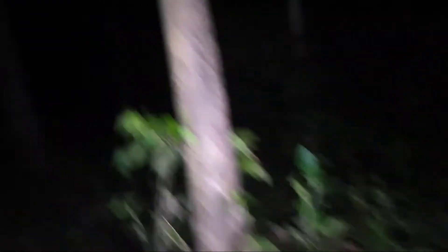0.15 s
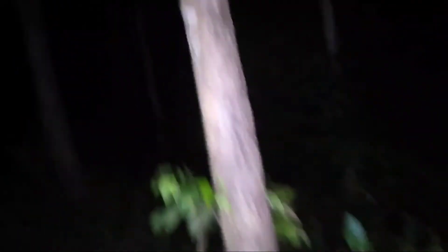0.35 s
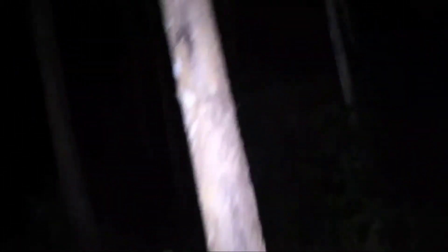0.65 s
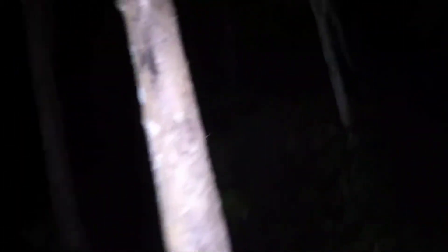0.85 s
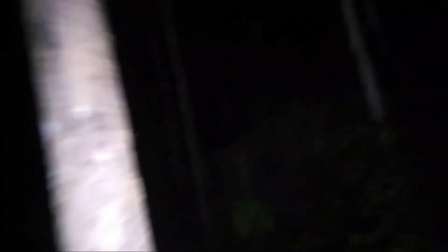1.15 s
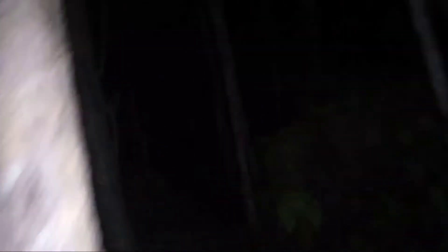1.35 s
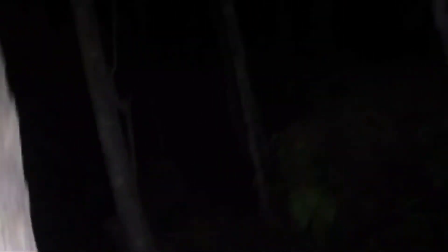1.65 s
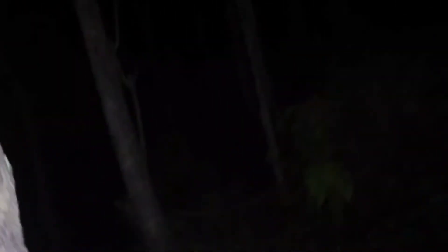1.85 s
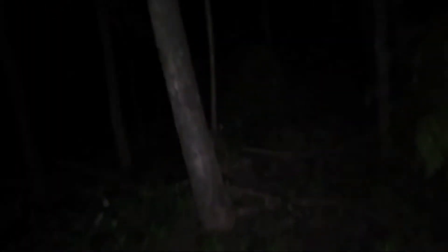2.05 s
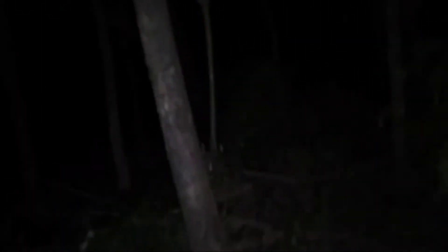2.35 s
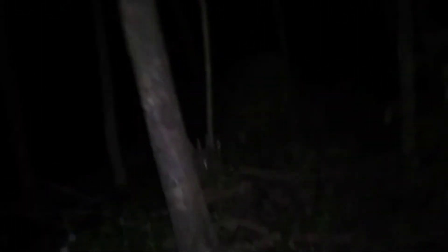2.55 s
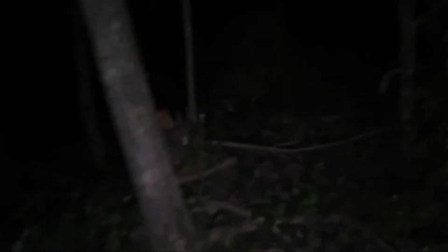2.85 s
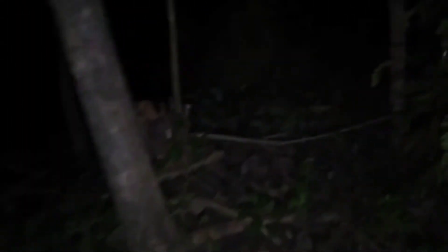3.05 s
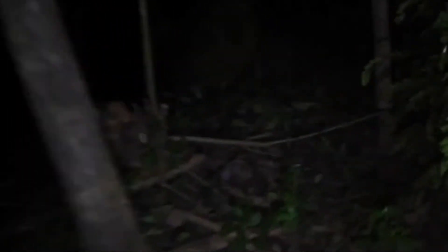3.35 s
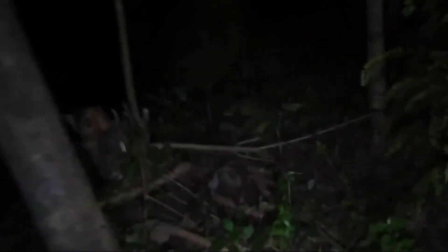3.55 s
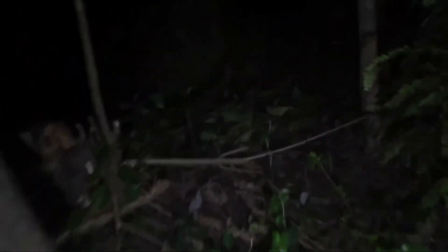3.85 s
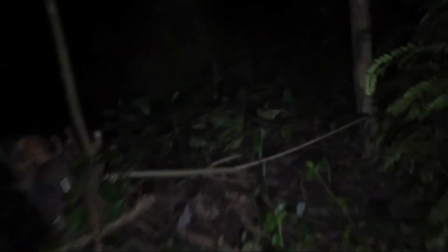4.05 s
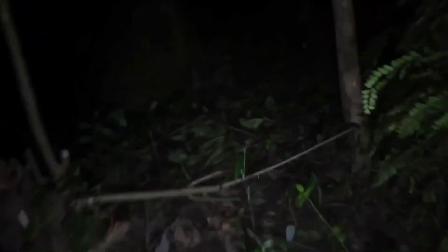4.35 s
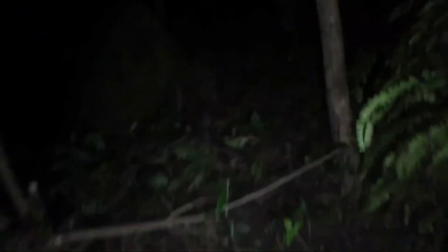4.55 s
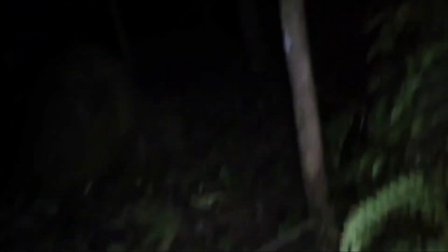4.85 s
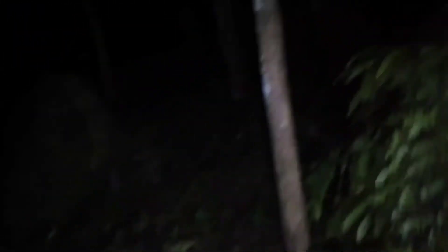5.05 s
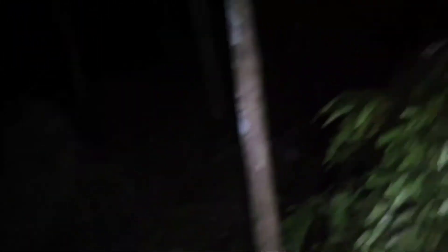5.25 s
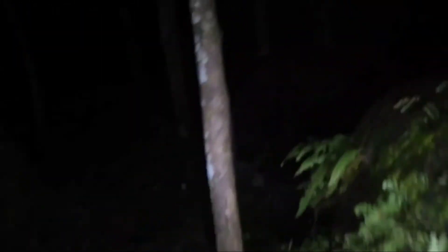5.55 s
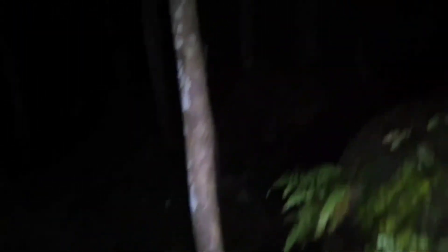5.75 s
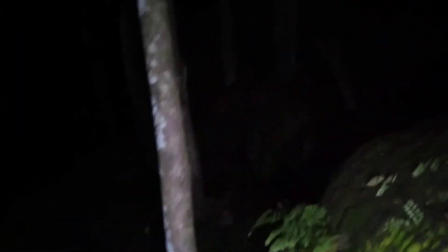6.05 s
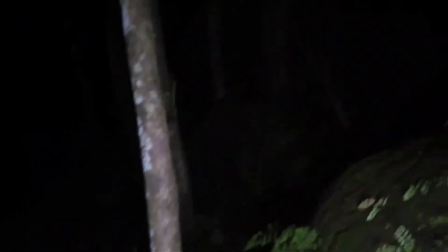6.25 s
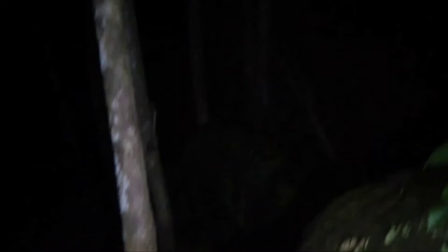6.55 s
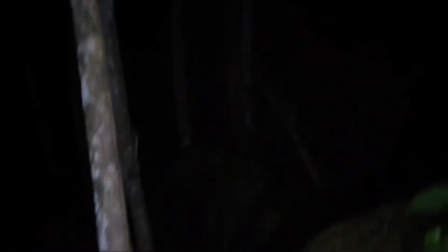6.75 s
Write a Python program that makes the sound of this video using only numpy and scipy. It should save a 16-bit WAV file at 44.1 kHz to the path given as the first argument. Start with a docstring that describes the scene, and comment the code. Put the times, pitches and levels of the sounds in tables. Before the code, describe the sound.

Shrill buzzing insects drone steadily in a dark forest, with crickets chirping below and twigs cracking underfoot as someone moves through undergrowth.

```python
"""A forest at night: a near katydid rasps in threes over a blur of far ones, while crickets trill and chirp lower
down. Wings sound as noisy file teeth and falling notes, shaped stroke by stroke. Someone walking slowly snaps
twigs, each a one-swing crack and a ringing scrunch, and stirs leaf litter made of scattered clicks. Owl-like
hoots, husky sine tones, sound far off in an airy hush with a low drone."""
import sys
import numpy as np
from scipy import signal
from scipy.fft import rfft, irfft
from scipy.io import wavfile
from scipy.ndimage import uniform_filter1d

SR = 44100
rng = np.random.default_rng(int(sys.argv[2]) if len(sys.argv) > 2 else 0)


def generate_wav(sig):
    """Save sig (samples, or channels by samples) to the path in sys.argv[1] as 16-bit PCM at SR."""
    pcm = np.round(np.clip(np.atleast_2d(sig).T, -1, 1) * 32767).astype(np.int16)
    wavfile.write(sys.argv[1], SR, pcm)


N = 305172  # length in samples


def gain_of(db):
    """Decibels to gain."""
    return 10 ** (np.asarray(db) / 20)


def evened(x):
    """Scales to rms 1."""
    return x / np.sqrt(np.mean(x ** 2) + 1e-20)


def add(mix, s, sound):
    """Lays a sound into the mix at s seconds."""
    part = mix[round(s * SR):][:len(sound)]
    part += sound[:len(part)]


def curves(rows, t):
    """Reads every column of a table at the times t, in straight lines between rows."""
    s, *columns = np.transpose(rows)
    return [np.interp(t, s, c) for c in columns]


def coloured(x, points):
    """Weights the spectrum of x by a curve of (Hz, dB), then evens it to rms 1."""
    f, db = np.transpose(points)
    hz = np.fft.rfftfreq(len(x), 1 / SR)
    weight_db = np.interp(np.log(hz + 1), np.log(f), db, -120, -120)
    return evened(irfft(rfft(x) * gain_of(weight_db), len(x)))


def resonate(x, hz, width_hz):
    """Rings x at a pitch that may move: shifts hz down to zero, smooths twice, and shifts back."""
    turn = np.exp(2j * np.pi * np.cumsum(hz * np.ones(len(x))) / SR)
    r = np.exp(-np.pi * width_hz / SR)
    smooth = signal.lfilter([(1 - r) ** 2], [1, -2 * r, r * r], x / turn)
    return 2 * (turn * smooth).real


def wander(per_s):
    """Slow chance of rms 1, heading for a new value per_s times a second."""
    steps = round(N / SR * per_s) + 2
    return evened(np.interp(np.arange(N) / SR * per_s, np.arange(steps), rng.standard_normal(steps)))


def teeth(per_s, spread_db):
    """Clicks of either sign at uneven moments with uneven force, as when file teeth slip."""
    slips = rng.random(N) < per_s / SR
    sign = rng.choice([-1., 1.], N)
    force = gain_of(spread_db * np.minimum(rng.exponential(1, N), 4))
    return slips * sign * force


def burst(turns, start, rise, fall, steep=1.74):
    """Loudness of one stroke in each cycle: it rises, then dies away or stops short (times in cycles)."""
    since = (turns - start) % 1
    return (1 - np.exp(-since / rise)) * np.exp(-(since / fall) ** steep)


def patchy(x, db, size, bins, frames):
    """Colours the sound in drifting patches of time and pitch."""
    z = signal.stft(x, nperseg=size)[2]
    patches = uniform_filter1d(rng.standard_normal(z.shape), bins, 0)
    patches = evened(uniform_filter1d(patches, frames, 1))
    coloured_x = signal.istft(z * gain_of(db * patches), nperseg=size)[1][:N]
    return coloured_x / gain_of(db ** 2 * np.log(10) / 20)  # offsets the power the patches add on average


def pips(turns, strokes, length, hz, fall_hz, spread_hz, bed_hz, bed):
    """Short notes that fall in pitch, over a wider noise smear of like notes from farther off."""
    gate = sum(gain_of(db) * burst(turns, s, 0.049, length) for s, db in strokes)
    since = np.min([(turns - s) % 1 for s, _ in strokes], 0)
    pitch_hz = hz - fall_hz * (since / length - .5) + spread_hz * wander(12)
    tone = np.sin(2 * np.pi * np.cumsum(pitch_hz) / SR)
    note = evened(gate * gain_of(1.15 * wander(40)) * tone)
    smear = evened(resonate(rng.standard_normal(N), hz, bed_hz))
    return evened(note + bed * smear)


SKIP_AT_S, SKIPPED_S = 2.03, .0215


def song_clock():
    """Time for the katydids and the cricket trill; the sound skips once, passing over a sliver of time."""
    t = np.arange(N) / SR
    return t + SKIPPED_S * (t > SKIP_AT_S)


KATYDID_PER_S = 17.3  # mean song cycles a second
# Drift of the near katydid off its mean rate. Each row: time in seconds, lag in cycles.
KATYDID_LAG = [(0, 0.37), (1.2, 0.034), (1.6, -0.069), (2.05, -0.088), (2.9, 0.016), (3.6, 0), (4.4, 0.12),
               (5.2, 0.151), (6, 0.1), (6.6, -0.037), (6.95, 0.012)]
# The three wing strokes of a song cycle.
# Each row: start in cycles, closing scrape in dB, lower return scrape in dB.
STROKES = [(0.799, -4.5, 1.5), (0.0843, 2, -1), (0.361, 4, 5.5)]
# The walker turns among the singers.
# Each row: time in seconds, chorus level in dB, presence of the near singer from 0 to 1.
WALK = [(0, -26, .12), (.23, -24, 0.53), (.7, -24, .2), (1.4, -23.5, 0.5), (2.1, -23.5, 0.5),
        (2.7, -22.5, 0.48), (3, -22.5, 0.85), (3.22, -21.5, 0.49), (3.9, -21.5, 0.82), (4.14, -22.5, .9),
        (4.6, -21.5, .9), (5.2, -22.5, 0.77), (5.52, -21.5, 0.94), (6, -21.5, .8), (6.44, -23.4, 0.53),
        (6.7, -22, .78), (6.95, -21.5, .8)]
# Wing layers over the chorus. Each row: time in seconds, treble in dB, low wing hum in dB,
# return scrape in dB, lower wing edge in dB.
PARTS = [(0, -14, -30.5, -16, -18), (1.1, -15.5, -29, -8.5, -22.5), (2.05, -10, -31.5, -10, -18.5),
         (2.3, -11, -25, -9, -17), (2.75, -11.5, -23, -18, -18), (3.1, -10.5, -27, -21, -18),
         (3.6, -11, -29, -10.5, -19.5), (4.2, -9.5, -28.5, -10.5, -22), (5.15, -9, -28, -14, -19.5),
         (5.7, -12.5, -34.5, -5, -27), (6, -6, -33, -7.5, -27), (6.4, -6, -30.5, -18, -15.5),
         (6.95, -15, -30, -19, -23.5)]
# Pitch of the return scrape. Each row: time in seconds, pitch in Hz.
RETURN_HZ = [(0, 5930), (1.8, 5820), (5.2, 5790), (5.6, 6110), (6.2, 6200), (6.95, 5850)]
# Colours of the main wing ring, its upper edge, its top fizz and its lower edge.
# Each row: frequency in Hz, relative weight in dB.
WING = [(4400, -52), (5000, -37.5), (5450, -13.5), (6000, -4.5), (6800, 2.5), (7400, -2), (8100, -11),
        (9200, -26), (11500, -33.5)]
UPPER = [(7500, -35), (8800, 1), (10500, -4), (12500, -3), (14000, -31)]
FIZZ = [(9000, -58), (11000, -14), (12200, -17), (13200, -5.5), (14200, -1), (15000, 3), (15600, 12.5)]
LOWER = [(2800, -29), (3200, -16), (3900, -14.5), (4400, -2.5), (5000, 1.5), (5500, 4.5), (6000, -24)]
UPPER_DB, UPPER_NEAR_DB = -26, 7.0  # upper edge over the chorus, and its growth as the near singer fills it


def katydids():
    """Scraped file teeth ring the near wings in each stroke; steady noise in the same colours is the far blur."""
    t = song_clock()
    level_db, near = curves(WALK, t)
    treble_db, hum_db, return_db, lower_db = curves(PARTS, t)
    near = np.clip(near, 0, 1)
    turns = KATYDID_PER_S * t - curves(KATYDID_LAG, t)[0]
    force = gain_of(.6 * wander(55))  # no two strokes alike

    def stroked(column, delay, *shape):
        """Loudness of the three strokes, from one level column."""
        return force * sum(gain_of(row[column]) * burst(turns, row[0] + delay, *shape) for row in STROKES)

    def with_far(share, scrape):
        """Near scrape and far blur, shared by power."""
        near_part = np.sqrt(np.clip(share, 0, 1)) * evened(scrape)
        return near_part + np.sqrt(np.clip(1 - share, 0, 1)) * rng.standard_normal(N)

    closing = stroked(1, -0.02, 0.18, 0.2, 1.87)  # slow to ring up, damped at the end
    wing = coloured(with_far(0.71 * near, closing * teeth(16000, 0.48)), WING)
    returning = stroked(2, 0.12, 0.17, 0.2, 4.5) * teeth(16000, 0.88)
    return_scrape = evened(resonate(returning, curves(RETURN_HZ, t)[0], 690))  # slower, so lower

    edge = stroked(1, 0, 0.014, 0.24, 1.0)  # the edges and fizz follow the teeth at once
    upper = coloured(with_far(near, edge * teeth(12000, 1.2)), UPPER)
    fizz = coloured(with_far(1.2 * near, edge * teeth(9000, 2.7)), FIZZ)
    lower = coloured(with_far(1.4 * near, edge * teeth(12000, 1.1)), LOWER)

    hum_strokes = [(s, 1.9 * db) for s, db, _ in STROKES]  # more contrast between strokes than the scrape
    hum = pips(turns - .01, hum_strokes, length=0.14, hz=2240, fall_hz=110, spread_hz=90, bed_hz=520, bed=0.79)

    rasp = wing + gain_of(return_db) * return_scrape
    rasp += gain_of(UPPER_DB + UPPER_NEAR_DB * near) * upper
    rasp += gain_of(treble_db) * fizz + gain_of(lower_db) * lower
    return gain_of(level_db) * rasp, gain_of(level_db + hum_db) * hum


TRILL_PER_S = 18.55  # mean song cycles a second
# The steady crickets. Each row: time in seconds, lag of the trill in cycles,
# trilling cricket in dB, far chirping crickets in dB.
CRICKETS = [(0, 0.051, -51, -50), (1.1, .045, -50.5, -52), (1.8, 0.033, -47, -50), (2.4, 0.047, -49.5, -51),
            (3.1, -0.0072, -47.5, -48), (3.6, -0.11, -48.5, -53), (4.8, -0.11, -49, -52),
            (5.6, -.02, -49.5, -49), (6, .08, -48.5, -50), (6.4, 0.1, -47.5, -53), (6.95, .08, -49, -50)]
# The three pulses of a trill cycle. Each row: start in cycles, level in dB.
TRILL = [(.04, -21), (.45, -3), (.74, 11)]


def crickets():
    """A trill of three falling pulses, and far chirps run together as flickering noise around one pitch."""
    t = song_clock()
    lag, trill_db, far_db = curves(CRICKETS, t)
    turns = TRILL_PER_S * t - lag
    flicker = gain_of(0.5 * wander(45))
    far = evened(resonate(rng.standard_normal(N) * flicker, 3560, 420))
    # bed: far trills against the near one
    trill = pips(turns, TRILL, length=0.16, hz=2600, fall_hz=200, spread_hz=60, bed_hz=680, bed=1.55)
    return gain_of(trill_db) * trill, gain_of(far_db) * far


# Colour of the night hush. Each row: frequency in Hz, relative weight in dB.
AIR = [(12, -20), (20, 4), (40, -3.5), (90, -4.5), (280, -19), (390, -11.5), (600, -11.5), (1500, -21),
       (2000, -31), (2600, -50), (4400, -90)]
AIR_DB = -58.5
# A low far drone. Each row: time in seconds, pitch in Hz, level in dB.
DRONE = [(0, 100, -60), (1.5, 103, -60), (2.5, 135, -61.5), (4, 153, -61.5), (5.8, 144, -61.5),
         (6.92, 144, -61.5)]


def air():
    """The hush of the night as coloured noise, with a drone of noise rung at a low moving pitch."""
    hz, db = curves(DRONE, np.arange(N) / SR)
    drone = gain_of(db) * evened(resonate(rng.standard_normal(N), hz, 150))
    return gain_of(AIR_DB) * coloured(rng.standard_normal(N), AIR) + drone


# Leaves under the feet. Each row: time in seconds, level in dB.
RUSTLE = [(0, -65), (1.9, -65), (3.5, -58), (6, -57), (6.5, -64.5), (6.95, -60)]
# Feet shoved through the leaves. Each row: middle in seconds, half length in seconds, level in dB.
SCUFFS = [(2.4, .15, -71), (3.186, 0.19, -57), (3.645, .06, -55), (3.803, 0.074, -46.5), (3.94, 0.052, -43)]
# Colour of the litter. Each row: frequency in Hz, relative weight in dB.
LITTER = [(120, -15), (300, -4), (800, 1.5), (1600, -4), (3000, -1), (6000, -14)]
# Twigs and litter breaking. Each row: start in seconds, crack in dB, scrunch in dB,
# ring of the wood in Hz, scrunch decay in seconds.
SNAPS = [(1.239, -44, -53, 525, 0.013), (2.341, -45, -49, 1100, .01), (2.349, -47, -47, 790, 0.017),
         (3.056, -44, -47, 1660, .006), (3.082, -44, -49, 805, .012), (3.106, -31, -47, 1190, .0077),
         (3.156, -36, -50, 1310, 0.0095), (3.176, -31, -36.5, 820, 0.019), (3.205, -44, -44, 1900, .006),
         (3.2113, -21, -35.5, 960, .0072), (3.323, -42, -50, 1000, .005), (3.362, -49, -50, 830, .01),
         (3.597, -37, -46, 1340, .008), (3.636, -39, -48, 1440, .011), (3.9395, -22, -44.5, 1350, .024),
         (4.4103, -19, -41, 1656, .0044), (4.4445, -23, -50, 1460, .004), (4.748, -45, -45, 808, 0.0044),
         (4.7625, -23, -40.5, 1220, 0.0054), (5.177, -33, -47, 885, .0086), (5.332, -40, -58, 603, 0.0083),
         (5.558, -38, -52, 500, .0085), (5.788, -45, -50, 805, 0.0082), (5.898, -46, -52, 619, 0.018)]
CRACK_OVER_RING = 1.46  # pitch of the crack against the ring of the wood


def footfalls():
    """Each snap is a one-swing crack and a scrunch that rings the wood briefly; litter crackles between."""
    snaps, u, t = np.zeros(N), np.arange(4000) / SR, np.arange(N) / SR
    grits = rng.standard_normal((len(SNAPS), len(u)))
    for (s, crack_db, scrunch_db, hz, decay_s), grit in zip(SNAPS, grits):
        swing = CRACK_OVER_RING * hz * u - 1  # cycles from the middle of the crack
        crack = np.sin(2 * np.pi * swing) * np.exp(-(swing / 0.41) ** 2)
        ring = evened(resonate(grit, hz, 480))
        crunch = 1.75 * evened(resonate(grit, 1840, 3000))
        fade = np.exp(-u / max(decay_s, .001)) * (1 - np.exp(-u / 0.00093))
        add(snaps, s, gain_of(crack_db) * crack + gain_of(scrunch_db) * (ring + crunch) * fade)

    level = gain_of(curves(RUSTLE, t)[0])
    level = level + sum(gain_of(db) * np.exp(-((t - s) / half_s) ** 2) for s, half_s, db in SCUFFS)
    uneven = gain_of(1.1 * wander(30))
    return snaps + level * uneven * coloured(teeth(1800, 3.7), LITTER)


# Bouts of a near cricket. Each row: first note in seconds, last note in seconds,
# approximate gap between notes in seconds, softest note peak in dB.
CHIRPS = [(1.207, 1.207, .047, -44), (1.299, 1.718, .0466, -41), (1.778, 1.97, .064, -41),
          (2.239, 2.481, .0484, -47), (2.699, 2.699, .047, -45), (2.922, 2.922, .047, -43),
          (3.706, 3.706, .047, -46), (3.944, 3.944, .047, -46), (4.312, 4.312, .047, -43),
          (5.647, 5.744, .0485, -44), (6.396, 6.396, .047, -45), (6.73, 6.73, .047, -47)]


def chirps():
    """Short pure notes that fall in pitch, evenly spaced within a bout."""
    out, u = np.zeros(N), np.arange(round(0.032 * SR)) / SR
    notes = []
    for first, last, gap, db in CHIRPS:
        count = round(abs(last - first) / gap) + 1
        notes += [(s, db) for s in np.linspace(first, last, count)]
    for (s, db), (tune, turn, force) in zip(notes, rng.random((len(notes), 3))):
        hz = (3860 - 11500 * u) * (1 + 0.019 * (tune - .5))
        tone = np.sin(2 * np.pi * (np.cumsum(hz) / SR + turn))
        note = gain_of(db + 3.0 * force) * signal.windows.tukey(len(u), .8) * tone
        add(out, s, note)
        add(out, s + 0.014, 0.21 * note)  # thrown back by a trunk
    return out


# Far owl-like calls. Each row: start in seconds, end in seconds, pitch in Hz, level in dB.
HOOTS = [(2.06, 2.31, 512, -62), (3.2, 4., 487, -64.5), (5.0, 5.464, 463, -59.5), (5.5, 6.396, 468, -68)]


def hoots():
    """Soft steady sine tones, made slightly husky by narrow noise at the same pitch."""
    out = np.zeros(N)
    for s, end_s, hz, db in HOOTS:
        u = np.arange(round((end_s - s) * SR)) / SR
        husk = evened(resonate(rng.standard_normal(len(u)), hz, 40))
        swell = signal.windows.tukey(len(u), .4)
        add(out, s, gain_of(db) * swell * (np.sin(2 * np.pi * hz * u) + 0.32 * husk))
    return out


def scene():
    """Insects, night air, walker and far hoots together."""
    rasp, hum = katydids()
    trill, far = crickets()
    singers = patchy(rasp + far, 0.89, size=512, bins=5, frames=10)  # trunks and leaves shade the singers
    bed = patchy(singers + air(), 3.56, size=2048, bins=1, frames=2)  # brief narrow pitches stand out
    notes = patchy(hum + trill, 1.5, size=256, bins=2, frames=8)
    return (bed + notes + footfalls() + chirps() + hoots())[None]


EDGE_HZ = 15490


def record(dry):
    """Limits the band with a steep low-pass filter at EDGE_HZ."""
    low_pass = signal.firwin(1023, EDGE_HZ, window=("kaiser", 9), fs=SR)
    return signal.oaconvolve(dry, low_pass[None], "same")


dry = scene()
out = record(dry)
generate_wav(out)
```